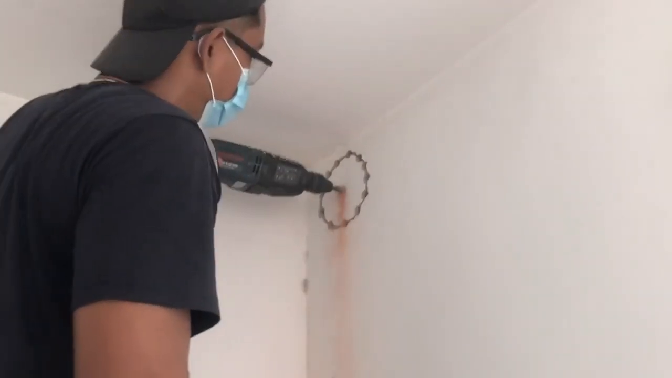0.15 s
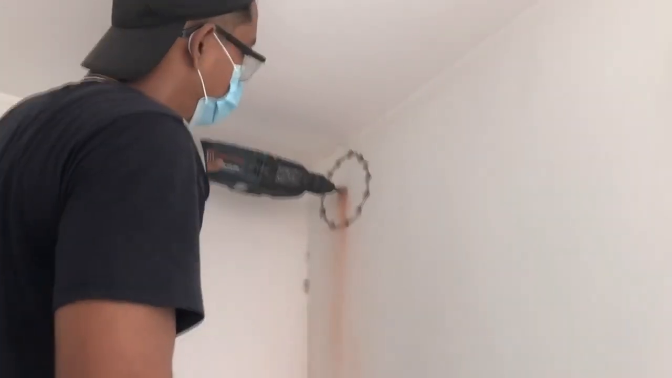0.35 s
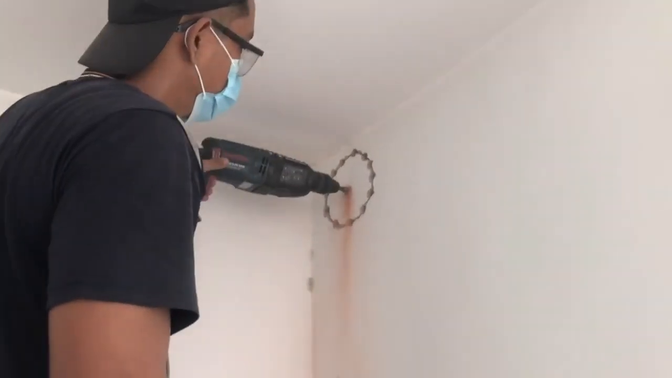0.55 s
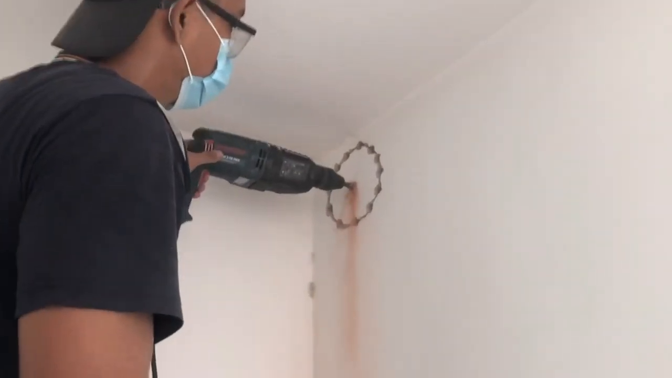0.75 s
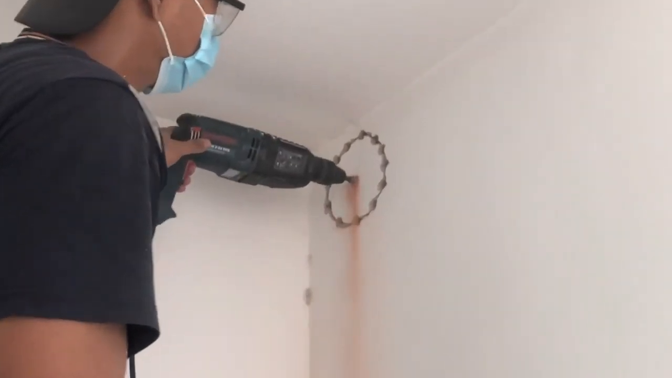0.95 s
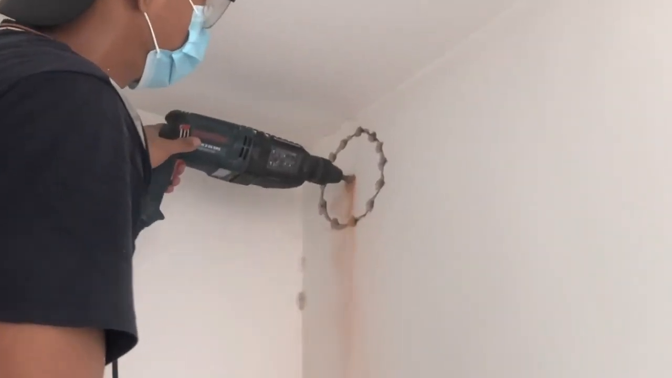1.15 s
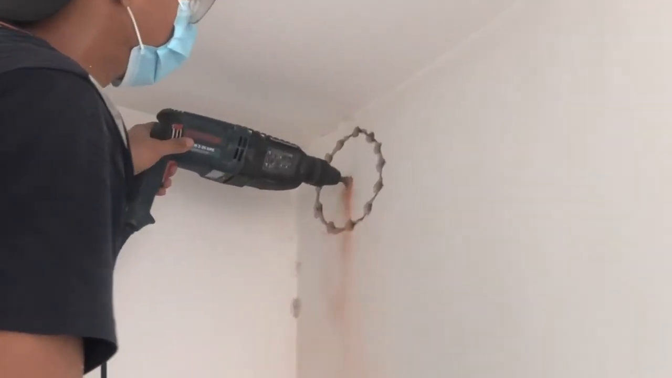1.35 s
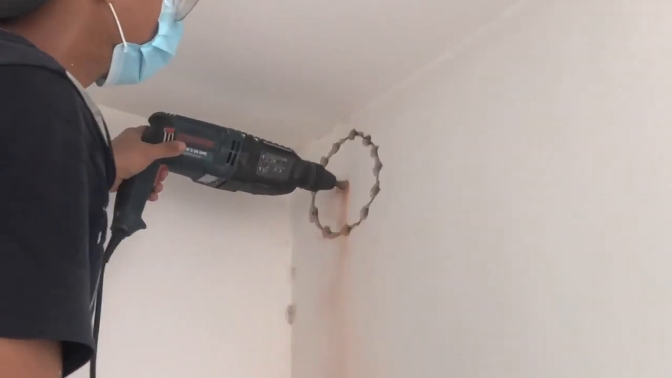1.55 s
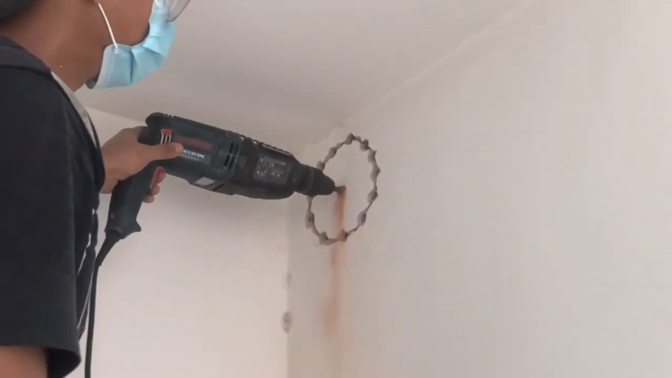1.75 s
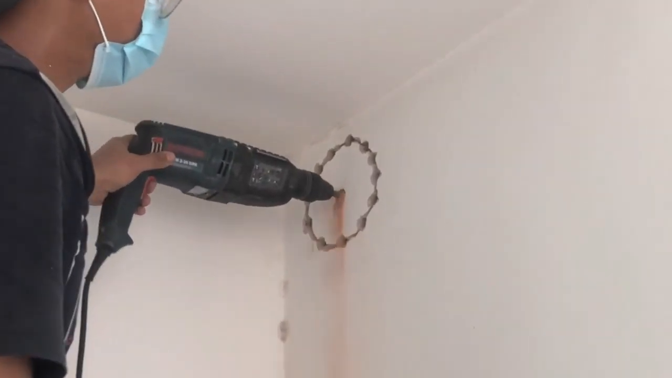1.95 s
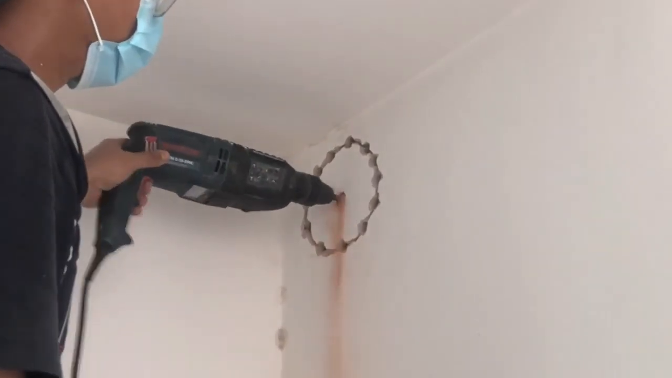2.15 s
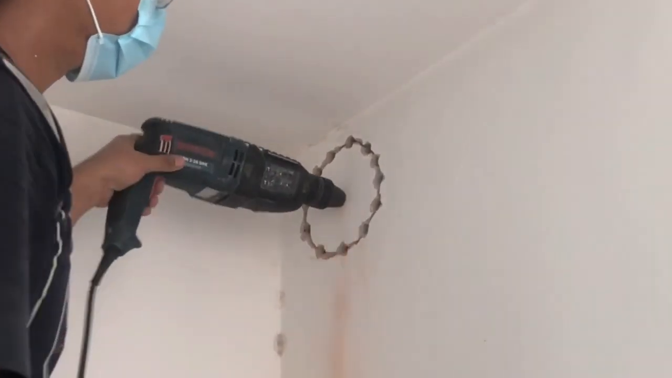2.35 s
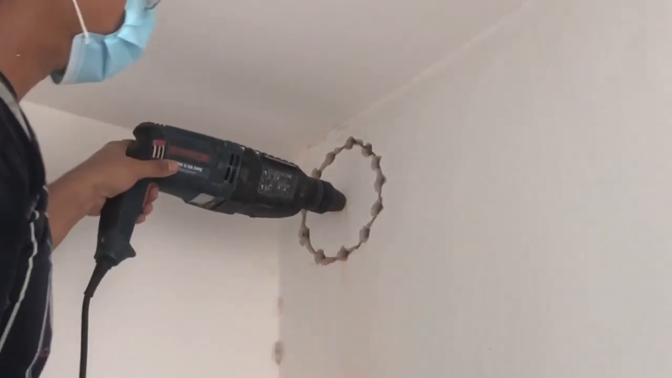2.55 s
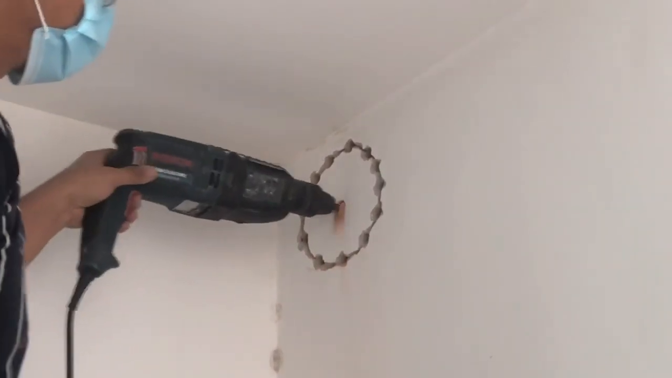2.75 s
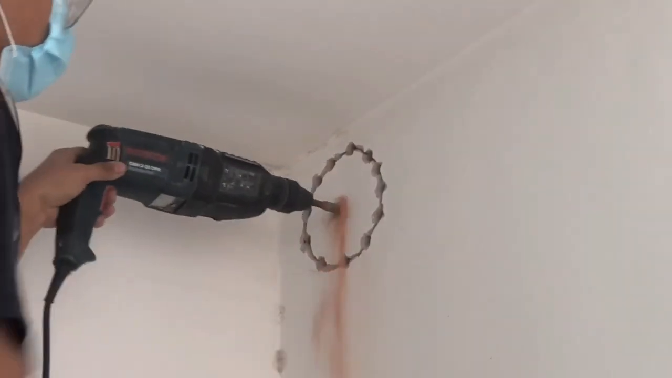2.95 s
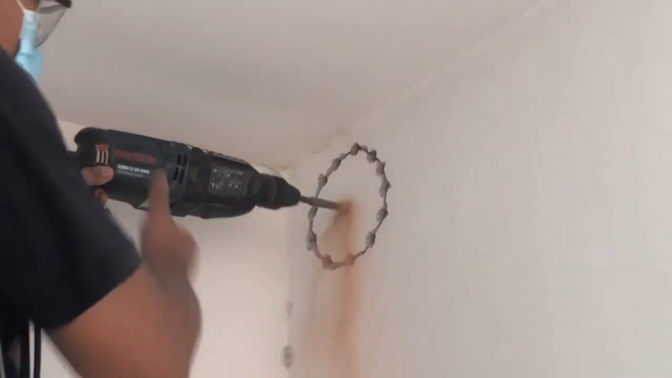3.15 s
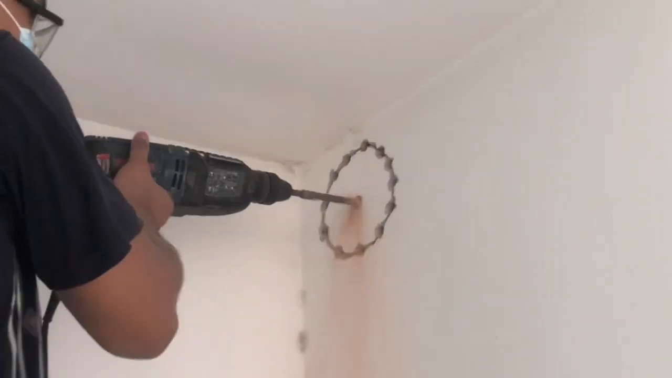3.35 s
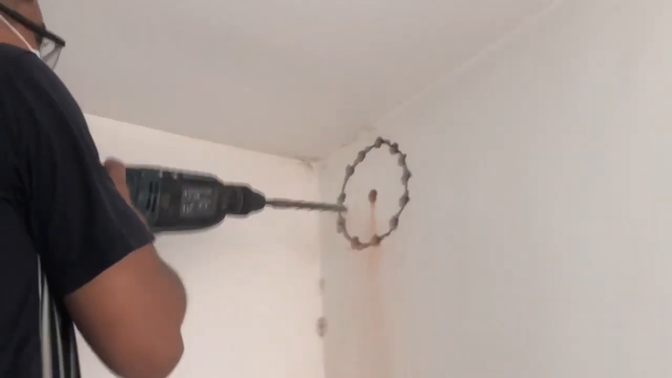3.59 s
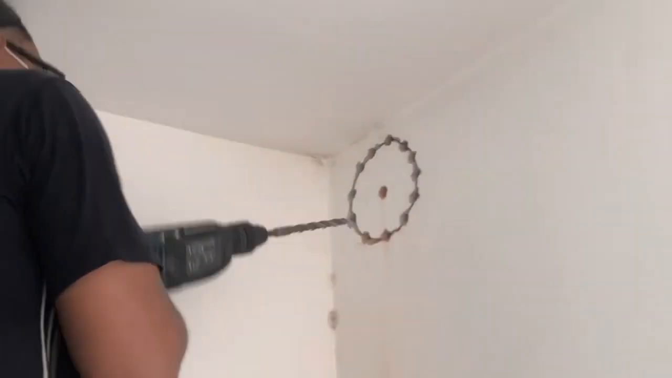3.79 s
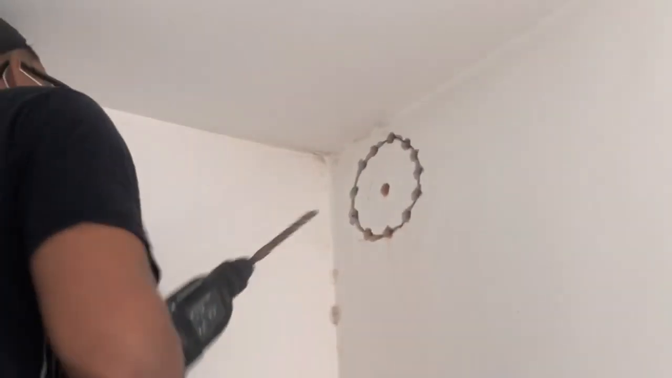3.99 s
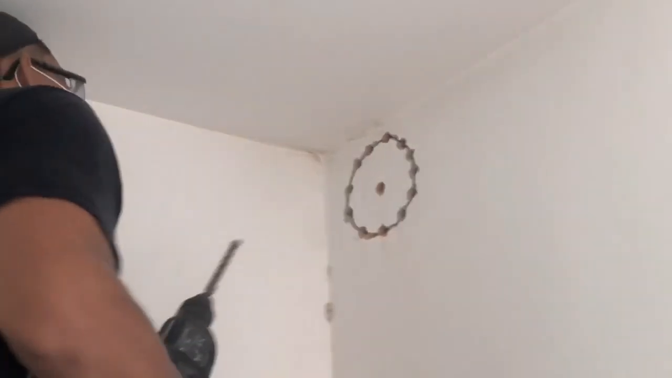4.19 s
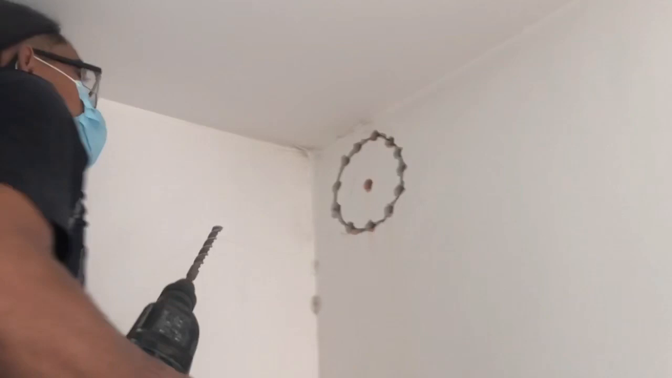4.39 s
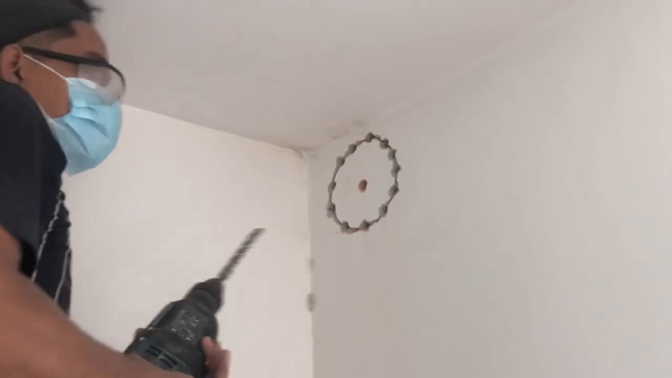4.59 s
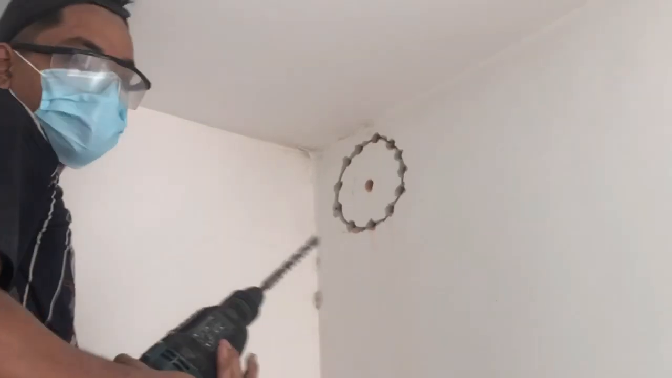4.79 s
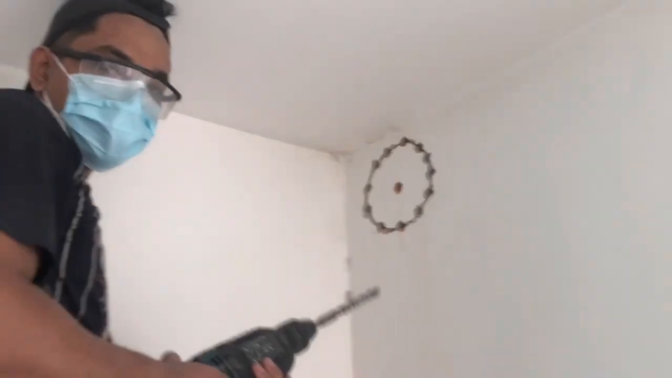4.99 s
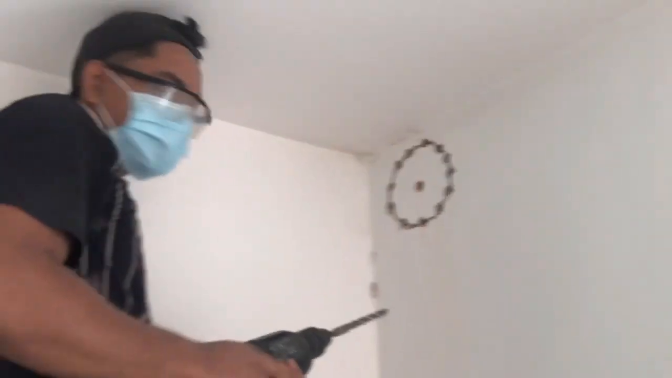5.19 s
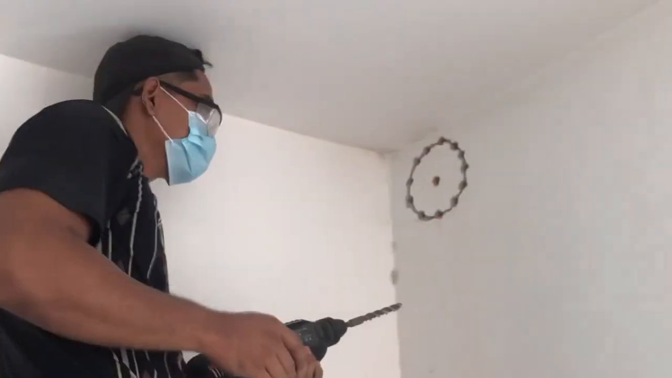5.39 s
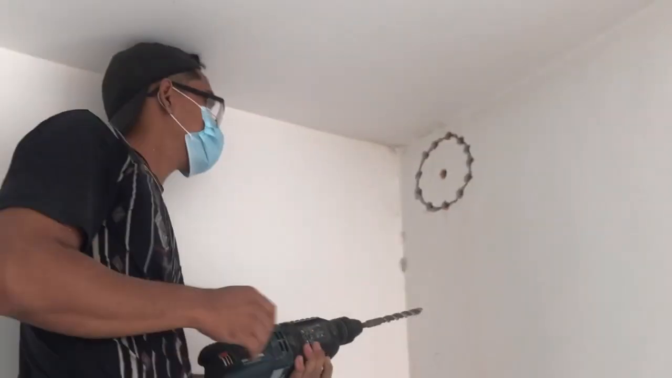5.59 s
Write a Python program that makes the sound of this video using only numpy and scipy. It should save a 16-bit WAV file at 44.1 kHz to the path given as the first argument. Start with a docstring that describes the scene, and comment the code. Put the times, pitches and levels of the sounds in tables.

```python
"""A bare room, where a rotary hammer bores into a wall, its piston striking the bit once per turn of the crank.
The bit breaks through, the blows stop and the unloaded motor races as the bit scrapes out; then it coasts down
while the loose bit clinks and squeals in the chuck. The tool knocks and ticks as it is lowered; a soft thump follows.
Filtered noise makes the impacts and hiss, decaying modes the steel and the body, crank-locked sines the whines;
one crank speed drives hammer and motor, and a decaying noise tail makes the room. Both channels are alike."""
import sys
import numpy as np
from scipy import signal
from scipy.fft import rfft, irfft
from scipy.io import wavfile
from scipy.ndimage import uniform_filter1d

SR = 44100
rng = np.random.default_rng(int(sys.argv[2]) if len(sys.argv) > 2 else 0)


def to_wav(sig):
    """Store sig (one row per channel, or 1-D mono) as 16-bit WAV at the path in sys.argv[1].

    Samples outside -1..1 are clipped; the rate is SR.
    """
    pcm = np.clip(np.atleast_2d(sig), -1, 1) * 32767
    pcm = np.round(pcm).astype(np.int16)
    wavfile.write(sys.argv[1], SR, pcm.T)  # frames by channels


N = 248503
TIME = np.arange(N) / SR


def from_db(db):
    """Decibels to gain."""
    return 10 ** (np.asarray(db) / 20)


def rms_one(x):
    """Scale to unit power."""
    return x / np.sqrt(np.mean(x ** 2) + 1e-20)


def steady(x):
    """Evens out the slow level to about unit power, leaving the fast rattle."""
    return x / np.sqrt(np.abs(uniform_filter1d(x ** 2, size=SR // 14)) + 1e-9)


def at_hz(points, hz):
    """Read a table on a log-frequency axis."""
    known_hz, values = np.transpose(points)
    return np.interp(np.log(np.maximum(hz, 1)), np.log(known_hz), values)


def drift(rate):
    """Smooth chance of rms 1 that changes rate times a second."""
    return rms_one(np.interp(TIME * rate, np.arange(4096), rng.standard_normal(4096)))


def ramp(start_s, length_s):
    """Rises from 0 to 1, then stays."""
    return np.clip((TIME - start_s) / length_s, 0, 1)


def swell(middle_s, length_s):
    """Rises smoothly from 0 to 1 and falls back."""
    return np.sin(np.pi * ramp(middle_s - length_s / 2, length_s)) ** 2


def colour(x, spectrum):
    """Causal (minimum-phase) filter; only the spectrum's shape counts, its gain for white noise is 1."""
    size = 2 ** 18
    bin_hz = np.arange(size // 2 + 1) * SR / size
    gain = rms_one(from_db(at_hz(spectrum, bin_hz)))
    # folding the cepstrum forward gives minimum phase
    cepstrum = irfft(np.log(gain))
    cepstrum[1:size // 2] *= 2
    cepstrum[size // 2 + 1:] = 0
    return irfft(rfft(x, size) * np.exp(rfft(cepstrum)))[:N]


def fade(clicks, t60):
    """Each click starts an exponential decay of its own height, 60 dB down after t60 seconds."""
    return signal.lfilter([1], [1, -from_db(-60 / (t60 * SR))], clicks + 1e-18)


def ring(force, modes):
    """A unit click sets every mode ringing at its level."""
    out = 0
    for hz, db, t60 in modes:
        radius = from_db(-60 / (t60 * SR))
        w = 2 * np.pi * hz / SR
        mode = signal.lfilter([0, np.sin(w)], [1, -2 * radius * np.cos(w), radius ** 2], force + 1e-18)
        out = out + from_db(db) * mode
    return out


def clicks_at(rows):
    """One click for each row of (start_s, level_db)."""
    s, db = np.transpose(rows)
    return np.bincount(np.clip(s * SR, 0, N - 1).astype(int), from_db(db), N)


def grit(per_s, spread_db):
    """Dense tiny impacts of uneven size and either sign; rms 1."""
    sizes = from_db(spread_db * np.clip(rng.standard_normal(N), -2, 2))
    signed = sizes * rng.choice([-1, 1], N)
    return rms_one(signed * (rng.random(N) < per_s / SR))


def strokes(turns, jitter_s, spread_db):
    """One click per crank turn, each a little off in time and strength."""
    s = TIME[np.diff(np.floor(turns), prepend=-1) > 0]
    chance = rng.standard_normal((600, 2))[:len(s)]
    moments_s = s + jitter_s * chance[:, 0]
    return clicks_at(np.c_[moments_s, spread_db * np.minimum(chance[:, 1], 1)])


def tones(turns, crank_hz, orders, waver, rate, response, swells=()):
    """Sines locked to the crank, each wavering in strength and phase, weighted by a frequency response."""
    out = 0
    for multiple, db in orders:
        angle = (2 * np.pi * ((multiple * turns + rng.random()) % 1)).astype(np.float32)
        # the response is read every 16 samples
        gain = np.repeat(from_db(db + at_hz(response, multiple * crank_hz[::16])), 16)[:N]
        gained_db = sum(rise * swell(s, length) for line, s, length, rise in swells if line == multiple)
        gain = gain * from_db(gained_db)
        out = out + gain * ((1 + waver * drift(rate)) * np.sin(angle) + waver * drift(rate) * np.cos(angle))
    return out * np.sqrt(2 / (1 + 2 * waver ** 2))


# how long the bare room rings on: pitch_hz, t60_s
ROOM_DECAY = [(150, 0.29), (800, 0.82), (2000, 0.52), (5500, 0.23), (15000, 0.29)]


def room(x, wet_db):
    """Direct sound plus a diffuse tail whose decay varies with pitch; a higher wet_db seems farther off."""
    t, tail = TIME[:SR], 0
    edges = np.geomspace(60, 18000, 9)
    for low, high in zip(edges, edges[1:]):
        bandpass = signal.butter(2, [low, high], "band", fs=SR, output="sos")
        band = signal.sosfilt(bandpass, rng.standard_normal(SR))
        tail = tail + band * from_db(-60 * t / at_hz(ROOM_DECAY, np.sqrt(low * high)))
    tail = tail * (t > .004)  # a short gap after the direct sound
    return x + from_db(wet_db) * signal.fftconvolve(x, tail / np.sqrt(np.sum(tail ** 2)))[:N]


# tone of the still room: pitch_hz, level_db (relative, per Hz)
AIR_TONE = [(18, -63.5), (30, -29), (75, -9.5), (86, -3.5), (106, -12.5), (153, -10), (179, -15.5),
            (866, -22.5), (1160, -24.5), (2010, -27.5), (3060, -27.5), (3980, -28.5), (16000, -39)]


def still_air():
    """The faint, steady noise of the room, as filtered white noise."""
    return from_db(-56) * colour(rng.standard_normal(N), AIR_TONE)


# standing waves of the room: pitch_hz, level_db (relative), t60_s
STANDING_WAVES = [(68, -5, 0.61), (98, -6, .5), (146, -3, .7), (236, -2, 1), (290, -11.5, 0.2),
                  (318, 3.5, 0.37)]
# a soft thump: start_s, level_db (relative)
THUMP_HITS = [(5.436, -51.5)]
# tone of the rustle that trails it: pitch_hz, level_db (relative, per Hz)
RUSTLE_TONE = [(120, -23), (230, 1.5), (330, 2), (480, -12), (1200, -10.5), (4000, -23), (16000, -25)]


def soft_thump():
    """A bump sets the standing waves ringing and a noisy rustle dies away behind it."""
    bump = clicks_at(THUMP_HITS)
    rustle = colour(fade(bump, t60=.9) * rng.standard_normal(N), RUSTLE_TONE)
    return room(ring(bump, STANDING_WAVES) + from_db(-4.5) * rustle, wet_db=-12.0)


# light ticks as the grip shifts: start_s, level_db (relative)
GRIP_TICKS = [(4.858, -32.5), (4.958, -39), (5.0125, -39), (5.0645, -40), (5.113, -38)]
# tone of a tick: pitch_hz, level_db (relative, per Hz)
TICK_TONE = [(590, -44), (1000, -13), (1400, -5), (3420, -6), (3710, -5), (7980, -15), (12000, -21),
             (16000, -22)]


def grip_ticks():
    """Each shift of the grip is a short burst of filtered noise."""
    bursts = fade(clicks_at(GRIP_TICKS), t60=0.046) * rng.standard_normal(N)
    return room(from_db(-4.0) * colour(bursts, TICK_TONE), wet_db=-4.5)


# the tool knocks in the hands: start_s, level_db (relative), rattle_db (housing against the knock)
HAND_KNOCKS = [(4.129, -16.5, -6), (4.333, -16, -7), (4.39, -17, -8), (4.454, -12.5, -7),
               (4.615, -12.5, -4.5), (4.644, -17.5, -7), (4.736, -14, 0), (4.777, -31, 4.5)]
# tone of a knock: pitch_hz, level_db (relative, per Hz)
KNOCK_TONE = [(180, -68), (300, -21.5), (565, -24), (790, -6.5), (1100, -9.5), (1520, -11.5), (1745, 3),
              (1930, -7.5), (3030, -6), (3400, -12.5), (4090, -8.5), (7080, -27), (8940, -14.5),
              (16000, -52.5)]
# tone of the rattly ring of the housing: pitch_hz, level_db (relative, per Hz)
HOUSING_TONE = [(300, -27), (550, -25), (790, -12.5), (1000, -17), (1350, -13), (1520, -14), (1680, -7.5),
                (1810, -6), (1920, -11), (2080, -7), (2500, -15), (2900, -7), (3250, -5.5), (3500, -18),
                (4100, -14), (5000, -21), (12000, -50)]


def tool_knocks():
    """Each knock is a short noise burst; the shaken housing rattles on as fading grit."""
    s, knock_db, rattle_db = np.transpose(HAND_KNOCKS)
    hits = clicks_at(np.c_[s, knock_db])
    shakes = clicks_at(np.c_[s, knock_db + rattle_db])
    burst = fade(fade(hits, t60=0.035), t60=0.0019) * rng.standard_normal(N)
    knocks = from_db(-25.0) * colour(burst, KNOCK_TONE)
    rattle = from_db(-20.5) * colour(fade(shakes, t60=0.36) * grit(per_s=1700, spread_db=4.0), HOUSING_TONE)
    return room(knocks + rattle, wet_db=-4.5)


# the loose bit hits the chuck: start_s, level_db (relative), lower_db (lower modes against level_db)
CHUCK_CLINKS = [(3.6734, -11, 3), (3.766, -12.5, 1), (3.843, -14, -2), (3.8964, -21, 6), (3.956, -16, -12),
                (4.1295, -7.5, -3), (4.215, -18, 10), (4.3627, -13, 7), (4.422, -13.5, 9),
                (4.4323, -10, -5), (4.4943, -16.5, 13.5), (4.577, -23, 12), (4.684, -19, 6)]
# lengthwise modes of the steel bit: pitch_hz, level_db (relative), t60_s
BIT_MODES = [(4850, -15, 0.02), (7600, -12, .02), (7900, -13, .025), (11520, 1.5, 0.022),
             (11850, -3.5, .012), (12350, -3, .007), (15250, -1, 0.022), (15550, -5, .012)]


def chuck_clinks():
    """The loose bit chatters against the chuck: fading noise rings its lower and upper modes apart."""
    s, peak_db, lower_db = np.transpose(CHUCK_CLINKS)
    rough = rng.standard_normal(N)
    chatter = fade(clicks_at(np.c_[s, peak_db]), t60=0.013) * rough
    lower = fade(clicks_at(np.c_[s, peak_db + lower_db]), t60=0.036) * rough
    steel = from_db(-24.5) * (ring(lower, BIT_MODES[:3]) + ring(chatter, BIT_MODES[3:7]))
    return room(steel + from_db(-36) * lower, wet_db=-2.0)


# the shank squeals in the chuck as it slows: middle_s, length_s, pitch_hz, level_db
CHUCK_SQUEALS = [(4.49, .27, 4810, -39), (4.46, .3, 2230, -36)]


def chuck_squeals():
    """Each squeal of the slowing shank is a sine of unsteady pitch and level."""
    squeals = 0
    for s, length, hz, db in CHUCK_SQUEALS:
        pitch_hz = hz * (1 + .008 * drift(150))
        level = from_db(db + 2 * drift(65)) * swell(s, length)
        squeals = squeals + level * np.sqrt(2) * np.sin(2 * np.pi * np.cumsum(pitch_hz) / SR)
    return squeals


# tone of the flutes in the hole: pitch_hz, level_db (relative, per Hz)
SCRAPE_TONE = [(700, -43), (1130, -9), (1250, -12), (1450, -2), (1750, -7.5), (2080, 5.5), (2330, -12),
               (2560, -1.5), (3000, -8), (7000, -20.5), (15000, -21.5)]


def flute_scrape(turns):
    """The flutes scrape the hole as the bit is drawn out: grit that throbs once per crank turn."""
    throb = fade(strokes(turns, jitter_s=0.0011, spread_db=-2.5), t60=.04)
    rubs = grit(per_s=6800, spread_db=7.0) * throb
    scrape = steady(room(colour(rubs, SCRAPE_TONE), wet_db=-1.5))
    return from_db(-19) * swell(middle_s=3.16, length_s=0.46) * scrape


# loudness of the clacks: time_s, level_db
CLACK_COURSE = [(3.3, -60), (3.57, -27), (3.77, -23.5), (3.95, -27), (4.05, -38), (4.3, -90)]
# tone of a clack: pitch_hz, level_db (relative, per Hz)
CLACK_TONE = [(200, -38), (800, -1.5), (2200, 1), (5000, -8.5), (8000, -19.5), (16000, -30.5)]
CLACK_S = 3.8655  # one clack falls about here and sets the phase of the rest


def piston_clacks(turns):
    """For a while on the way down, the slack piston knocks on every turn, as bursts of grit."""
    hits = strokes(turns - np.interp(CLACK_S, TIME, turns) % 1, jitter_s=.0005, spread_db=.5)
    force = fade(fade(hits, t60=.03), t60=.015)
    clacks = steady(room(colour(force * grit(per_s=9000, spread_db=2.5), CLACK_TONE), wet_db=-9.5))
    return from_db(np.interp(TIME, *np.transpose(CLACK_COURSE))) * clacks


# gear whines that cross resonances: multiple (of crank rate), middle_s, length_s, width_hz, level_db
RESONANCE_SWEEPS = [(9, 2.25, .35, 50, -29), (35, 2.6, .75, 420, -24), (104.2, 2.7, .8, 90, -33),
                    (32.3, 3.25, .5, 200, -27), (94.3, 3.38, .55, 70, -35), (19.2, 3.75, .7, 35, -34),
                    (98.5, 3.72, .35, 110, -37), (66.5, 3.76, .35, 140, -33), (32.8, 3.77, .26, 70, -29),
                    (113.3, 3.82, .4, 50, -38), (130, 3.83, .2, 60, -38), (67, 4.06, .42, 130, -33),
                    (114, 4.14, .4, 45, -37), (36, 4.12, .6, 70, -38), (101, 4.3, .3, 80, -38),
                    (173, 4.36, .3, 90, -39)]


def gear_sweeps(turns):
    """Whines locked to the crank swell as they cross resonances, roughened by a random walk of phase."""
    out = np.zeros(N)
    for multiple, s, length, width_hz, db in RESONANCE_SWEEPS:
        on = np.abs(TIME - s) < length / 2
        t = TIME[on] - TIME[on][0]
        phase = np.interp(t * width_hz, np.arange(1024), np.cumsum(rng.normal(0, 1.6, 1024)))
        whine = np.sqrt(2) * np.sin(2 * np.pi * multiple * turns[on] + phase)
        out[on] += from_db(db) * np.sin(np.pi * t / length) ** 2 * whine
    return out


# the bit binds and drags the motor down, last as it is drawn out: time_s, lost_hz (crank turns per s)
BIND_SAG = [(0, 3), (.2, 0), (1.15, 0), (1.24, 8.8), (1.36, 12.3), (1.46, 11.8), (1.6, 2.3), (1.75, 1),
            (1.82, 9), (1.9, 6.8), (1.98, 2.3), (2.06, .8), (2.13, 4), (2.22, .5), (2.32, 1.6), (2.44, 0),
            (2.8, 0), (3.1, 2.2), (3.4, 0)]


def binding():
    """Crank speed lost as the bit binds, in turns per s."""
    return np.interp(TIME, *np.transpose(BIND_SAG))


# the bit breaks through the wall; the trigger is let go
BREAKTHROUGH_S, RELEASE_S = 2.125, 3.195
# crank turns per s while boring unbound and running free, and the time constant of picking up
BORING_HZ, FREE_HZ, SPIN_UP_S = 69.3, 83, .21
# braking by friction (turns per s, per s), and the speed at which the fan brakes as much (turns per s)
FRICTION_HZ_PER_S, DRAG_EQUAL_HZ = 29.8, 49.7


def crank_speed(sag_hz):
    """Held down while boring, racing once through, then braked by fan drag and friction; inertia rounds it."""
    freed = 1 - np.exp(-np.maximum(TIME - BREAKTHROUGH_S, 0) / SPIN_UP_S)
    driven = BORING_HZ + (FREE_HZ - BORING_HZ) * freed - sag_hz
    # constant friction plus drag by speed squared slows along a tangent curve
    braked = FRICTION_HZ_PER_S / DRAG_EQUAL_HZ * np.maximum(TIME - RELEASE_S, 0)
    coasting = DRAG_EQUAL_HZ * np.tan(np.maximum(np.arctan(FREE_HZ / DRAG_EQUAL_HZ) - braked, 0))
    return np.maximum(np.minimum(driven, uniform_filter1d(coasting, size=SR // 5)), 0)


def speed_level(crank_hz, free_db, slope_db, fade_db_per_s):
    """Level in dB: free_db at free speed, slope_db per tenfold speed; the room limits how fast it fades."""
    db = free_db + slope_db * np.log10(crank_hz / FREE_HZ + 1e-9)
    return np.maximum.accumulate(db + fade_db_per_s * TIME) - fade_db_per_s * TIME


def worn_teeth(turns, count):
    """The same uneven tooth contacts come round on every turn of a shaft."""
    place, size = rng.random(count), rng.standard_normal(count)
    whole = np.arange(int(turns[-1]))[:, None]
    at = np.interp((whole + place).ravel(), turns, np.arange(N)).astype(int)
    return steady(np.bincount(at, np.tile(size, len(whole)), N))


# whine of crank, gear teeth, fan blades and commutator under drive: multiple (of crank rate), level_db (relative)
DRIVEN_WHINE = [(1, -39), (4, -28), (4.75, -18), (5, -23), (8, -19), (9, -23), (10, -23), (14, -21),
                (16, -18), (19, -15), (26, -21), (33, -17), (34, -19), (36, -19), (38, -18), (85.5, -25),
                (95, -22), (104.5, -20)]
# the same, coasting: multiple (of crank rate), level_db (relative)
COASTING_WHINE = [(19, -12.5), (32, -14), (64, -12), (95, -17), (114, -9), (171, -7)]
# single lines of the driven whine swell and ease: multiple (of crank rate), middle_s, length_s, gain_db
WHINE_SWELLS = [(5, 2.55, .7, 9.5), (8, 2.52, .4, 7), (34, 2.58, .6, 11), (19, 2.8, 1.1, 7),
                (10, 2.75, .4, 7), (85.5, 3.11, .35, 8), (95, 3.12, .4, 8)]
# how well the housing radiates the coasting whine: pitch_hz, level_db (relative)
HOUSING_RADIATION = [(300, -26), (480, -8), (700, -4.5), (950, 0), (1150, -4), (1350, 2), (1600, -3),
                     (2300, -2), (2650, 0), (3280, 0), (3500, -10), (4800, -7), (6500, -14)]


def motor_whine(turns, crank_hz, contact, dragging, coasting):
    """Crank-locked sines; without drive the teeth ride on their other flanks and the whine changes."""
    driven = tones(turns, crank_hz, DRIVEN_WHINE, waver=0.18, rate=18,
                   response=[(30, 0.0052), (9000, 0)], swells=WHINE_SWELLS)
    # the wall's load and drag on the bit both damp it
    driven = driven * from_db(-5.5 * contact - 5 * dragging)
    free = tones(turns, crank_hz, COASTING_WHINE, waver=0.47, rate=45, response=HOUSING_RADIATION)
    free = free * np.clip(crank_hz / 14, 0, 1)
    return from_db(-2) * room(np.sqrt(1 - coasting) * driven + np.sqrt(coasting) * free, wet_db=-9)


# tone of the gears: pitch_hz, level_db (relative, per Hz)
GEAR_TONE = [(88, -71.5), (150, -68), (226, -17), (274, -19.5), (385, -7.5), (444, -11), (520, -6.5),
             (640, -9), (820, -4), (1040, -6), (1570, -0.5), (2330, -1), (2700, 0), (5000, -10),
             (6500, -23), (11000, -120)]
# tone of the fan and brush hiss: pitch_hz, level_db (relative, per Hz)
FAN_TONE = [(100, -55.5), (2350, -32.5), (4000, 1.5), (5870, -2), (6820, 0), (7840, -5), (8600, -2),
            (15100, -14), (16000, -22)]


def motor(turns, crank_hz, contact, dragging):
    """Gear clatter throbs with the crank, fan and brushes hiss, and the armature and teeth whine."""
    coasting = ramp(RELEASE_S, 0.3)
    gear_db = speed_level(crank_hz, free_db=-17, slope_db=19, fade_db_per_s=60)
    gear_db = gear_db + 2.5 * (1 - coasting)  # louder while driven
    fan_db = speed_level(crank_hz, free_db=-15.5, slope_db=51, fade_db_per_s=120)
    brush_db = speed_level(crank_hz, free_db=-27, slope_db=15, fade_db_per_s=120)
    # the throb goes with the drive; at low speed the slack gears flutter more
    depth = 1.2 * (1 - coasting)
    flutter = from_db(np.interp(crank_hz, [20, 70], [1.8, .8]) * drift(130))
    pulses = fade(strokes(turns, jitter_s=0.00048, spread_db=1.5), t60=.04)
    throb = steady(flutter * (3.0 + depth * pulses))
    # the armature turns 19 times for 4 of the crank; its teeth sing through as the clatter calms
    armature = turns * 19 / 4
    teeth = worn_teeth(armature, count=60) * np.interp(crank_hz, [25, 75], [.35, .12])
    clatter = throb * (grit(per_s=9000, spread_db=4.0) + teeth)
    gears = steady(room(colour(clatter, GEAR_TONE), wet_db=-8.0))
    gears = gears + from_db(-29.0) * rms_one(ring(clatter, STANDING_WAVES[3:]))
    hiss = steady(room(colour(throb * grit(per_s=16000, spread_db=5.5), FAN_TONE), wet_db=-5.5))
    whine = motor_whine(turns, crank_hz, contact, dragging, coasting)
    return from_db(gear_db) * (gears + whine) + np.hypot(from_db(fan_db), from_db(brush_db)) * hiss


# tone of the shaken wall: pitch_hz, level_db (relative, per Hz)
WALL_TONE = [(88, -42), (150, -38.5), (226, -1.5), (271, -22), (337, 1.5), (436, -1), (707, 8.5), (857, 1),
             (1100, 3), (1430, -18.5), (2420, -120)]
# the wall's drone under an even beat: multiple (of crank rate), level_db (relative)
EVEN_DRONE = [(1, -17.5), (2, -23.5), (3, -7), (4, -11), (5, -7.5), (6, -1.5), (7, 2.5), (8, -3.5), (9, -1),
              (10, -9), (11, 3.5), (12, -12), (14, -2), (19, 0), (23, -15.5), (24, 0), (30, 0.5), (32, -6)]
# the wall's drone with the drill labouring: multiple (of crank rate), level_db (relative)
LABOURED_DRONE = [(1, -22.5), (2, -20.5), (3, -14), (4, -7), (5, -6.5), (6, -5.5), (7, -6.5), (8, -7),
                  (9, -7.5), (11, -11.5), (19, -9), (20, -3.5)]
# how the wall answers the laboured drone: pitch_hz, level_db
LABOURED_RESPONSE = [(55, -11.5), (67, 7.5), (170, -12.5), (228, 5.0), (270, -6.5), (335, 1.5),
                     (1150, -4.5), (1310, -4.5), (1450, -7.5)]


def wall(blows, turns, crank_hz, labouring):
    """Blows shake the wall: thuds of noise over a drone, clean on an even beat and rougher when labouring."""
    thud = steady(room(colour(fade(blows, t60=0.046) * rng.standard_normal(N), WALL_TONE), wet_db=-7.0))
    even = tones(turns, crank_hz, EVEN_DRONE, waver=0.025, rate=21, response=[(30, 0.0061), (3000, 0.0083)])
    laboured = tones(turns, crank_hz, LABOURED_DRONE, waver=0.3, rate=20, response=LABOURED_RESPONSE)
    drone = from_db(-5.5) * ((1 - labouring) * even + labouring * laboured)
    return from_db(-24.5 + 5 * labouring) * (from_db(-1.0) * thud + drone)


# tone of the crushed grit and of the tip on stone: pitch_hz, level_db (relative, per Hz)
GRIT_TONE = [(470, -35), (800, -7.5), (862, -15.5), (1300, -5.5), (2150, -3), (8550, -11.5), (10400, -12.5),
             (11700, -5), (13400, -13), (15400, -11.5), (16000, -30)]
# every blow rings the body of the tool: pitch_hz, level_db (relative), t60_s
BODY_MODES = [(1323, -1, .045), (1650, -4, 0.057), (2100, 0, 0.03), (2440, -11, 0.015), (3158, 3, 0.018)]
# the wall grows thin and the bit stops rebounding, so that it rings in clean blows
THIN_S, THIN_RISE_S = 1.86, .12


def hammering(turns, crank_hz, labouring):
    """Every blow shakes the wall, crushes grit under the tip and rings the bit and the body of the tool."""
    thin = ramp(THIN_S, THIN_RISE_S)
    blows = strokes(turns, jitter_s=0.00007, spread_db=3.2)
    # the bit rebounds and rattles at odd moments between blows
    rebounds = np.abs(grit(per_s=130, spread_db=2.5))
    snaps = fade((1 - thin) * rebounds / rebounds.max() + 0.31 * blows, t60=0.02)
    force = fade(fade(blows, t60=0.029) + 1.7 * snaps, t60=0.01)
    crush = steady(room(colour(force * grit(per_s=11000, spread_db=1.5), GRIT_TONE), wet_db=-1.5))
    crush = from_db(-17.5 + 2.13 * labouring) * crush
    rough_force = force * from_db(2 * drift(40)) * grit(per_s=13000, spread_db=6.0)
    rough_ring = steady(room(ring(rough_force, BIT_MODES), wet_db=0.5))
    rough_ring = from_db(-27 + 3.5 * labouring + 2.4 * drift(6.7)) * rough_ring
    # the instant of contact: a short crack, and the same modes of the body every time
    contact = fade(fade(blows, t60=.016), t60=.003) * grit(per_s=20000, spread_db=0)
    crack = from_db(-23 + 0.5 * thin) * steady(room(colour(contact, GRIT_TONE), wet_db=-4.5))
    body = from_db(-24) * steady(room(ring(blows, BODY_MODES), wet_db=-6))
    clean_ring = from_db(-22.5) * steady(room(ring(contact, BIT_MODES), wet_db=0))
    steel = np.sqrt(1 - thin) * rough_ring + np.sqrt(thin) * clean_ring
    return wall(blows, turns, crank_hz, labouring) + crush + crack + body + steel


# labour (0-1): a small share always, more in every bind (sag in turns per s), and more once leant on
EASY_LABOUR, LEAN_LABOUR, MOST_LABOUR, FULL_DRAG_SAG_HZ = 0.23, 0.62, 0.86, 6
LEAN_S, LEAN_RISE_S = 1.24, 0.12
# once the bit is through, the blows die out and the motor comes up to its free loudness over these times
LET_GO_S, UNLOAD_S = .075, 0.11


def scene():
    """One crank speed drives the hammer and the motor; both channels are alike, as from one microphone."""
    sag_hz = binding()
    crank_hz = crank_speed(sag_hz)
    turns = np.cumsum(crank_hz) / SR
    contact = 1 - ramp(BREAKTHROUGH_S, LET_GO_S)
    dragging = np.minimum(sag_hz / FULL_DRAG_SAG_HZ, 1)
    leaning = ramp(LEAN_S, LEAN_RISE_S)
    labouring = np.clip(EASY_LABOUR + dragging + LEAN_LABOUR * leaning, 0, MOST_LABOUR)
    loaded = 1 - ramp(BREAKTHROUGH_S, UNLOAD_S)
    handling = soft_thump() + grip_ticks() + tool_knocks() + chuck_clinks()
    rubbing = chuck_squeals() + flute_scrape(turns)
    # the whole motor is 3 dB quieter under load
    running = from_db(-3 * loaded) * motor(turns, crank_hz, contact, dragging)
    drill = running + contact * hammering(turns, crank_hz, labouring)
    mono = still_air() + handling + rubbing + piston_clacks(turns) + gear_sweeps(turns) + drill
    return np.tile(mono, (2, 1))


def record(dry):
    """Peaks over full scale are clipped and the top is cut steeply above 16 kHz."""
    lowpass = signal.ellip(12, .1, 85, 16000, fs=SR, output="sos")
    return signal.sosfilt(lowpass, np.clip(dry, -1, 1))


dry = scene()
out = record(dry)
to_wav(out)
```